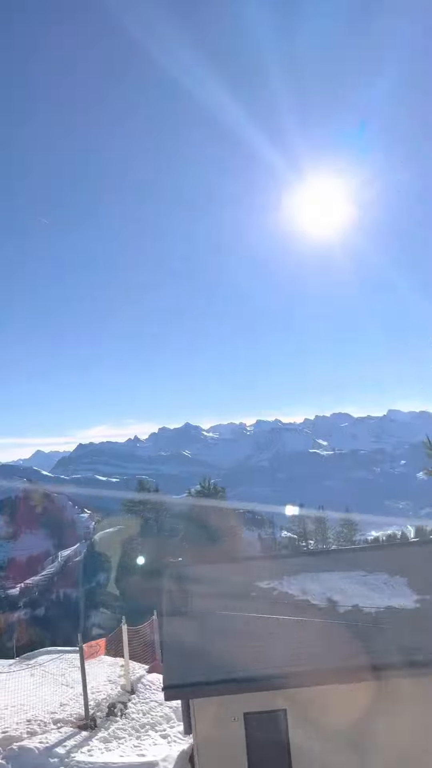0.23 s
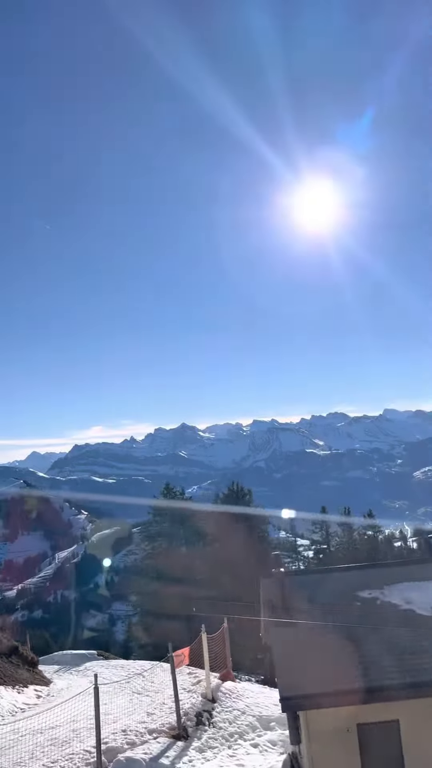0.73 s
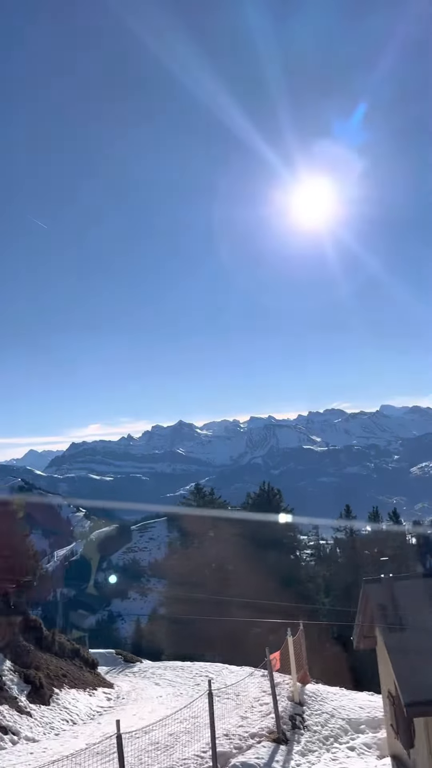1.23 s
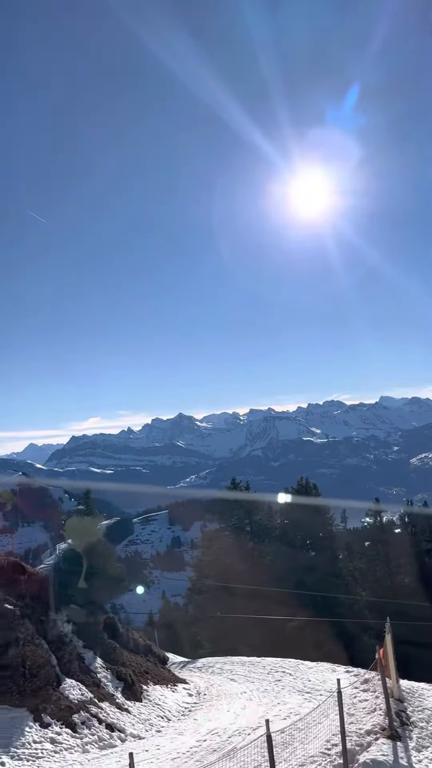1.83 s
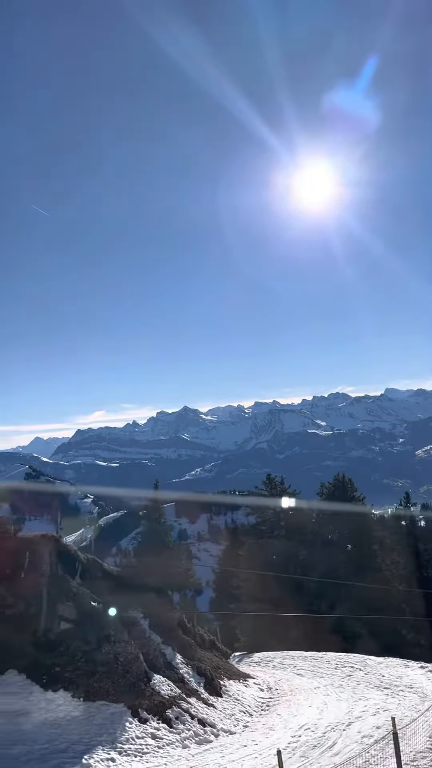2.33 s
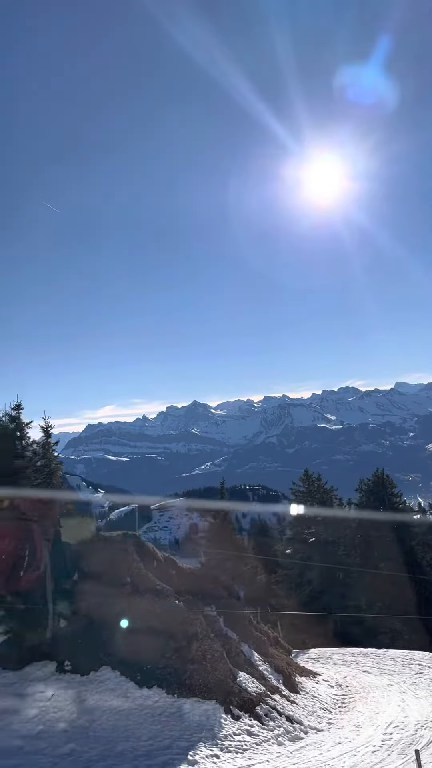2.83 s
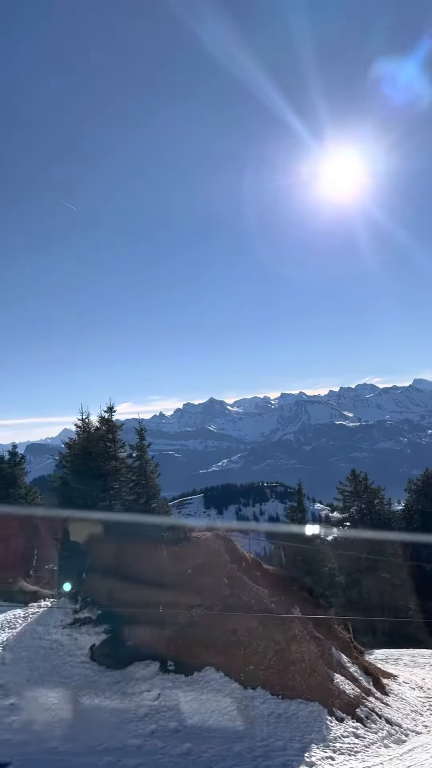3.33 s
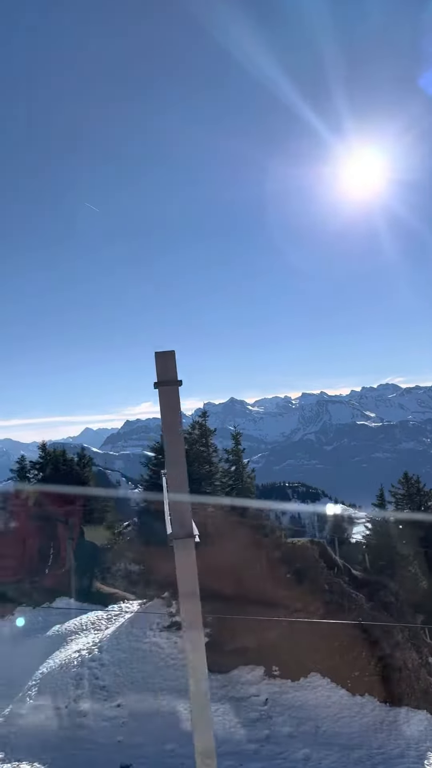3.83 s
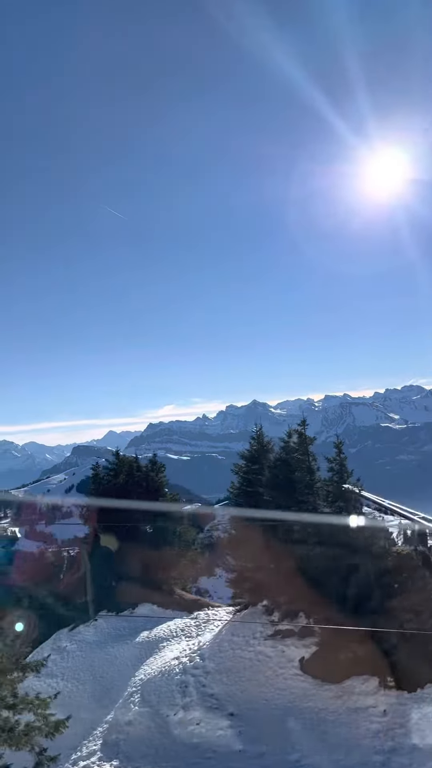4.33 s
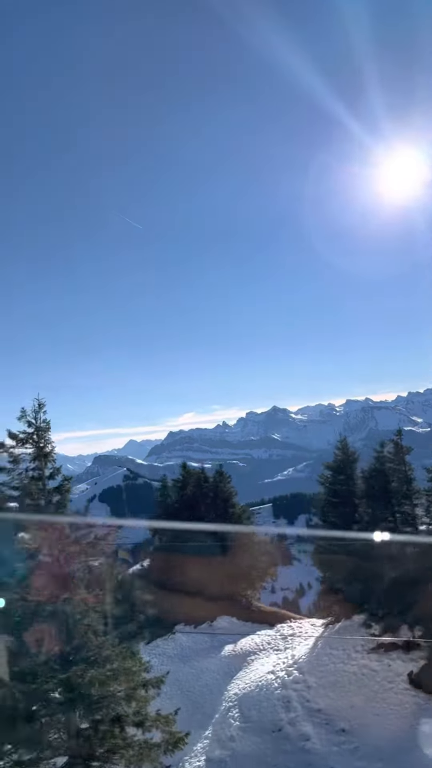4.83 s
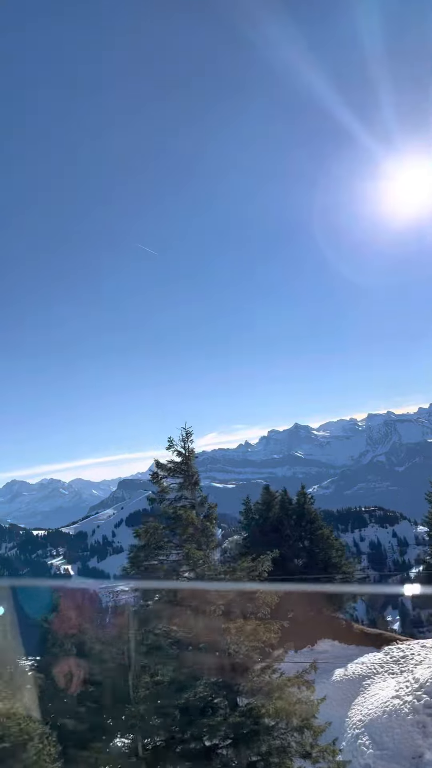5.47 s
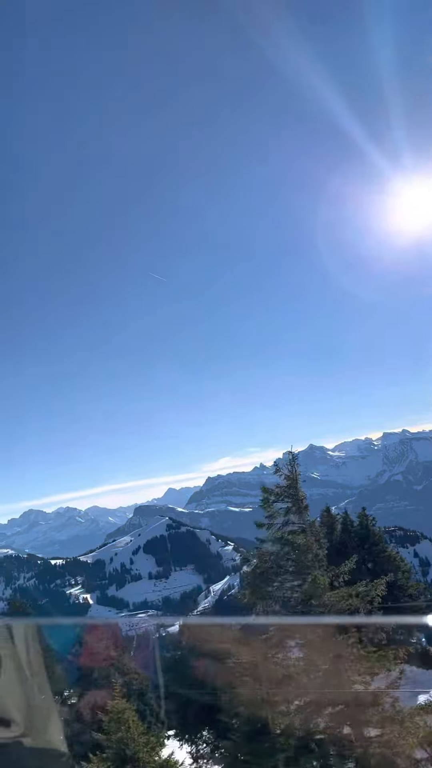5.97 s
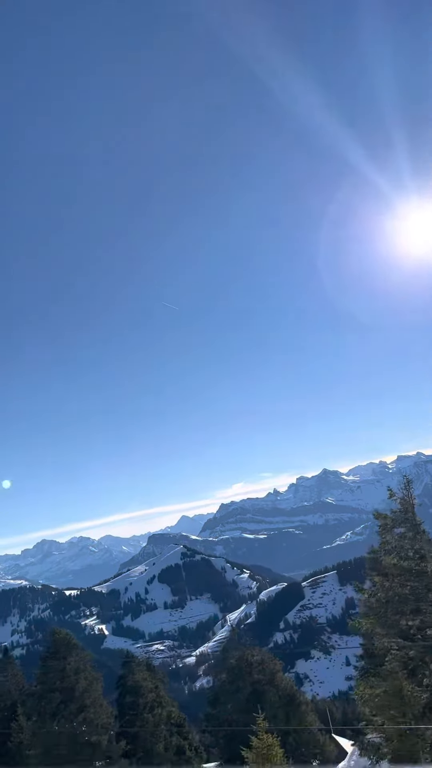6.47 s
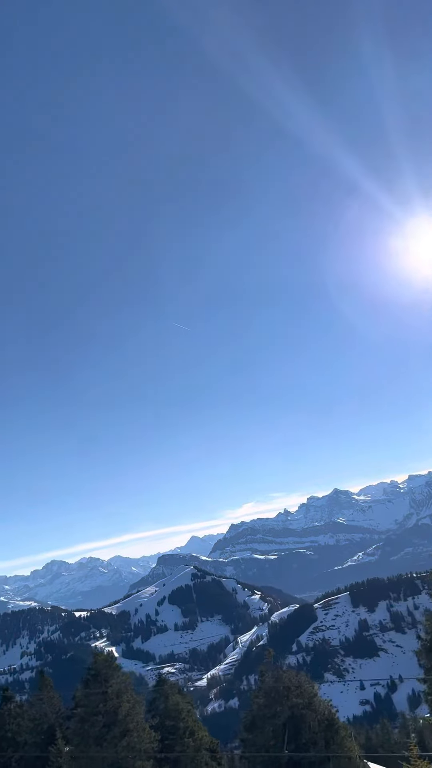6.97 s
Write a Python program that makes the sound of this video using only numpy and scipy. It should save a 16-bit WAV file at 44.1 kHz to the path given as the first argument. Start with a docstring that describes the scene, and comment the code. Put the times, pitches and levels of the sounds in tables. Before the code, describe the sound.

A cog train heard from a window seat: a deep buzzing drone grows quickly, then runs steadily with muffled knocks and soft floor thuds.

```python
"""Rack-railway carriage, from a window seat

Inside on a mountain line, on a two-port microphone; the sound swells for two seconds and then holds.
Sine tones make the cog's drone, the motor hum and the singing gears; narrow noise makes the gear whine.
Coloured stereo noise makes the floor and wall rumble, the roar and the hiss, whose treble reaches the
left port first. Damped modes make the knocks of the bumps, short tone swells the thuds of the heaving body.
A few faint squeaks are narrow noise, and one tiny dry tick is a filtered click."""
import sys
import numpy as np
from scipy import signal
from scipy.fft import rfft, irfft, next_fast_len
from scipy.io import wavfile
from scipy.ndimage import uniform_filter1d, map_coordinates

SR = 44100
rng = np.random.default_rng(int(sys.argv[2]) if len(sys.argv) > 2 else 0)


def master(y):
    """Save y as 16-bit WAV."""
    cut = np.clip(np.atleast_2d(y).T, -1, 1)
    pcm = np.round(cut * 32767)  # scale
    wavfile.write(sys.argv[1], SR, pcm.astype(np.int16))


N = 317520

# the rail roar, which also sets the level of the drive: level at full running/dB,
# growth/(dB per dB of swell), drift/(dB per s)
ROAR_RUNNING = (-42, 0.87, 0)


def amp(db):
    """Decibels to gain."""
    return 10 ** (np.asarray(db) / 20)


def unit(x):
    """x scaled to rms 1."""
    return x / np.sqrt(np.mean(x ** 2) + 1e-20)


def clock():
    """The time of each sample, in seconds."""
    return np.arange(N) / SR


def along(points, hz):
    """Each column of (f/Hz, ..) points, read on a log frequency axis."""
    f, *cols = np.transpose(points)
    return [np.interp(np.log(hz + 1), np.log(f + 1), c) for c in cols]


def curves(rows):
    """One value per sample for each column after the time."""
    s, *cols = np.transpose(rows)
    return [np.interp(clock(), s, c) for c in cols]


def wobble(rate):
    """A smooth random curve, rate knots a second."""
    knots = rng.standard_normal(int(N * rate / SR) + 4)
    steps = np.arange(0, len(knots) - 1, 1 / 10)
    return np.interp(clock() * rate, steps, map_coordinates(knots, [steps]))


def angle(hz):
    """The running phase of a moving frequency."""
    return 2 * np.pi * np.cumsum(hz) / SR


def bell(s, spread):
    """A smooth bell that rises to 1 at time s and falls away, with a standard deviation of spread seconds."""
    return np.exp(-.5 * ((clock() - s) / spread) ** 2)


def filtered(x, response):
    """x times a response of frequency."""
    m = next_fast_len(N + SR // 2)
    return irfft(rfft(x, m) * response(np.fft.rfftfreq(m, 1 / SR)), m)[..., :N]


def at_ports(pair, spectrum):
    """Two unrelated signals become coloured, partly alike sound at the two ports, their mean of rms 1."""
    # between the microphone ports: f/Hz, likeness 0-1, left lead/rad, left over right level/dB
    ports = [(50, .983, 0, 0), (140, .945, -.1, -.2), (280, .8, -.28, -.5), (440, .89, -.22, -.4),
             (580, .65, -.35, 1), (760, .64, -.2, 4), (1300, .67, -.4, 2.2), (1700, .82, 0, .6),
             (2100, .7, 1, 0), (2650, .66, 2, -.8), (3700, .6, 1.1, 1), (4700, .4, 2.1, -.6),
             (6000, .85, 3.1, 0), (8300, .86, 6.3, 0), (10400, .92, 9.4, 0), (14600, .9, 15.7, 0)]
    m = next_fast_len(N + SR // 2)
    hz = np.fft.rfftfreq(m, 1 / SR)
    likeness, lead, balance_db = along(ports, hz)
    a, b = rfft(pair, m) * amp(along(spectrum, hz)[0])
    mid = a * np.sqrt(1 + likeness)
    side = b * np.sqrt(1 - likeness)
    leftward = amp(balance_db / 2) * np.exp(1j * lead / 2)
    both = irfft(np.array([(mid + side) * leftward, (mid - side) / leftward]), m)[:, :N]
    return both / np.sqrt(np.mean(both.mean(0) ** 2) + 1e-20)


def rush(spectrum, patchy_db):
    """Coloured stereo noise with time-frequency patches of random gain, the mean of its ports at rms 1."""
    z = signal.stft(rng.standard_normal((2, N)), nperseg=512)[2]
    field = uniform_filter1d(rng.standard_normal(z.shape[1:]), size=4, axis=0)
    field = uniform_filter1d(field, size=12, axis=1)
    patchy = signal.istft(z * amp(patchy_db * unit(field)), nperseg=512)[1]
    return at_ports(patchy[:, :N], spectrum)


def steady(x, size):
    """x with its chance swells evened out over size samples."""
    return x / np.sqrt(np.abs(uniform_filter1d(x.mean(0) ** 2, size=size)) + 1e-6)


def fuzzy_line(phase, width_hz):
    """Two unrelated narrow noises around a running phase, wider for faster random curves."""
    noises = [wobble(width_hz) * np.cos(phase) + wobble(width_hz) * np.sin(phase) for _ in range(2)]
    return unit(np.array(noises))


def running(layer):
    """A layer's level in dB: it follows the train's swell and drifts about the middle of the scene."""
    # loudness of the running train, which the continuous layers follow: t/s, level/dB
    train_swell = [(0.05, -58.5), (.4, -55.5), (.8, -53), (1.3, -47), (1.55, -43.5), (2, -38), (2.4, -39.5),
                   (3.5, -38.5), (5.5, -39), (6.5, -39.5), (7.2, -38)]
    full_running_db = -38
    full_db, growth, drift_db_per_s = layer
    drift_db = drift_db_per_s * (clock() - clock().mean())
    return full_db + growth * (curves(train_swell)[0] - full_running_db) + drift_db


def shaking():
    """How hard floor and walls shake, in dB; each rough stretch comes and goes smoothly."""
    # rough track, where the rumble changes: middle t/s, spread/s, floor gain/dB, walls gain/dB
    rough = [(1.55, 0.086, 5, 4), (1.834, .06, 1, 1), (2.044, 0.049, 3, 1.5), (2.248, 0.095, 4, 1),
             (2.651, 0.29, 3, 2), (3.56, 0.034, 3, -0.5), (4.6, 0.13, 1, 2), (5.518, 0.11, 3, 1.5),
             (6.8, 0.38, 0.5, -1.5)]
    # level at full running/dB, growth/(dB per dB of swell), drift/(dB per s)
    floor_running = (-23.5, 0.7, .05)
    wall_running = (-30, 0.87, -0.062)
    floor_db = running(floor_running) + sum(db * bell(s, spread) for s, spread, db, _ in rough)
    wall_db = running(wall_running) + sum(db * bell(s, spread) for s, spread, _, db in rough)
    return floor_db, wall_db


def knock(age, hardness_db):
    """One blow of peak 1 on the floor's damped modes, each at a new strength; hardness lifts the high ones."""
    # the floor's answer to a jolt: f/Hz, level/dB, t60/s
    modes = [(114, -7.5, 0.036), (169.3, -2.5, 0.057), (227, 1, 0.049), (298, -2.5, 0.041),
             (438.6, -10, 0.036), (520, -12.5, 0.029), (611, -19.5, 0.028)]
    ring = np.zeros(len(age))
    for hz, level, t60 in modes:
        strength_db = level + hardness_db * np.log2(hz) + rng.normal(0, 2.35)
        ring += amp(strength_db - 60 * age / t60) * np.sin(2 * np.pi * hz * age)
    ring = ring * (1 - np.exp(-age / 0.0022))  # softened onset
    return ring / np.abs(ring).max()


def cog(teeth):
    """Teeth push on the rack as a tone and its octave, and a close upper tone beats so the drone throbs."""
    # level at full running/dB, growth/(dB per dB of swell), drift/(dB per s)
    cog_running = (-21, 0.87, -.1)
    # how hard the cog bears on the rack: t/s, level/dB
    bearing = [(0, -1), (2.6, -0.5), (2.9, 0), (3.35, 1.5), (4.05, -3.5), (4.55, -0.5), (5, -1), (5.5, -2),
               (5.85, -.5), (6.4, 0), (6.9, 0.5)]
    throb_hz, first_throb_s, throb_db = 4.32, .09, -9.5  # the level is against the cog's main tone
    beat = 2 * np.pi * throb_hz * (clock() - first_throb_s)
    neighbour = amp(throb_db + 0.75 * wobble(3.0)) * np.sin(teeth + beat + 0.2 * wobble(2.8))
    octave = amp(-11.5 + 3.3 * wobble(3.8)) * np.sin(2 * teeth + 0.34 * wobble(2.9))
    level_db = running(cog_running) + curves(bearing)[0] + 0.49 * wobble(5.9)
    return amp(level_db) * unit(np.sin(teeth) + neighbour + octave)


def rumble(teeth):
    """Wheels shake floor and wall panels: low noise of uneven level, the walls pulsing with the teeth."""
    # relative noise spectra: f/Hz, level/dB
    floor_colour = [(10, -31), (20, -31.5), (30, -19), (41, -10), (54, -.5), (66, 2.5), (98, -1.5),
                    (120, -5), (150, -5), (175, -15), (240, -22.5), (800, -120)]
    wall_colour = [(20, -59.5), (150, -9.5), (185, -1.5), (205, 2.5), (225, -5), (260, -0.5), (300, -5),
                   (325, -4.5), (365, -10), (425, -7), (455, -11), (490, -11.5), (590, -19.5), (2500, -120)]
    lurch_db, lurch_per_s = 1.75, 9  # random unevenness: depth on the floor, knots a second on both
    floor_db, wall_db = shaking()
    floor_db = floor_db + lurch_db * wobble(lurch_per_s)
    wall_db = wall_db + 1.54 * wobble(lurch_per_s) + np.cos(teeth)
    floor = amp(floor_db) * steady(rush(floor_colour, patchy_db=1.0), size=4500)
    walls = amp(wall_db) * steady(rush(wall_colour, patchy_db=1.0), size=4500)
    return floor + walls


def rail_noise(teeth):
    """The rail's roar, hiss and high fizz: noises that flutter together and pulse faintly with the teeth."""
    # relative noise spectra: f/Hz, level/dB
    roar_colour = [(100, -87.5), (560, -2.5), (630, 2.5), (700, -2), (780, 2), (880, -1.5), (970, -4),
                   (1150, -12), (1400, -13.5), (9000, -120)]
    hiss_colour = [(200, -82.5), (1100, 0), (1330, -1), (1700, -0.5), (2050, -0.5), (2300, 2.5),
                   (2650, 2.5), (3100, -5), (4000, -24.5), (10000, -80)]
    fizz_colour = [(800, -74), (2700, -6), (3200, -1), (3600, 2), (4200, -0.5), (5000, -2), (6100, -17),
                   (7200, -8), (8700, -23), (12200, -29.5), (14000, -26.5)]
    # level at full running/dB, growth/(dB per dB of swell), drift/(dB per s)
    hiss_running = (-44.5, 0.9, -.05)
    fizz_running = (-46.5, 0.96, -0.49)
    # the fizz flares as the swell gathers: t/s, spread/s, gain/dB
    flare_s, flare_spread, flare_db = (1.57, .08, 2.5)
    flutter_db = 0.099 * wobble(20) + 0.85 * wobble(60) + 0.19 * np.cos(teeth)
    roar_db = running(ROAR_RUNNING) + flutter_db + 0.36 * wobble(17)
    fizz_db = running(fizz_running) + flutter_db + flare_db * bell(flare_s, flare_spread)
    roar = amp(roar_db) * rush(roar_colour, patchy_db=1.4)
    hiss = amp(running(hiss_running) + flutter_db) * rush(hiss_colour, patchy_db=0.9)
    fizz = amp(fizz_db) * rush(fizz_colour, patchy_db=1.4)
    return roar + hiss + fizz


def jostle(count=110):
    """Rough rail gives small knocks at random moments and pitches, their level following the walls'."""
    age = np.arange(SR // 8) / SR
    knocks = np.zeros(N + len(age))
    for moment, size, stretch in rng.random((count, 3)):
        blow = knock(age * (0.802 + 0.422 * stretch), hardness_db=-2.5)
        knocks[int(moment * N):][:len(age)] += amp(-9 * size) * blow
    return amp(shaking()[1] - 5.5) * unit(knocks[:N])


def motor_hum(shaft):
    """The motor hums on multiples of its shaft rate, each wavering tone coming and going."""
    # multiple of the shaft rate, level/dB against the rail roar, loudest t/s, spread/s
    orders = [(2, 3, 4.4, 6.3), (3, 9, 1.9, 1.5), (4, 11.5, 2.8, 5.4), (4.5, 10, 2.9, 1.73),
              (6, 4.5, 6.4, 4)]
    hum = 0
    for k, db, s, spread in orders:
        tone = unit(np.sin(k * shaft + 0.19 * wobble(4.08)))
        hum = hum + amp(db + 1.9 * wobble(3.056)) * bell(s, spread) * tone
    return hum


def gear_whine(full_speed):
    """The gears whine as narrow noises whose pitch follows the motor's speed."""
    # f/Hz at full speed, width/Hz (knot rate), level/dB against the rail roar, loudest t/s, spread/s
    whines = [(420.7, 22, 2.3, 2, 3.5), (444.6, 22, 1, 2.9, 4.6), (825, 50, -8, 1.8, .9),
              (876, 40, -9.5, 2.6, 3), (1323, 100, -13, 4.3, 3.1), (2693, 130, -8, 2.6, 2.8)]
    whine = 0
    for hz, width_hz, db, s, spread in whines:
        whine = whine + amp(db) * bell(s, spread) * fuzzy_line(full_speed * hz, width_hz)
    return np.std(whine) * at_ports(whine, [(400, 0.0072), (3000, 0)])


def gear_singing(full_speed):
    """The gears sing in clean tones, unsteady in level and phase, stronger on the left."""
    # f/Hz at full speed, level/dB against the rail roar, loudest t/s, spread/s
    tones = [(450.5, -3.5, 6.5, .7), (786, -11, 7, .6), (823, -7, 5.7, .65), (822, -12, 1, 1.6),
             (871, -7, 2.9, 2), (967, -18, 4.6, 2)]
    waver_db, waver_rad, left_over_right_db = 2.6, .5, 2.5
    singing = 0
    for hz, db, s, spread in tones:
        tone = unit(np.sin(full_speed * hz + waver_rad * wobble(6)))
        singing = singing + amp(db + waver_db * wobble(6.1)) * bell(s, spread) * tone
    return amp(np.array([[.5], [-.5]]) * left_over_right_db) * singing


def drive():
    """Motor and gears turn on one shaft phase, and their tones share the level of the rail roar."""
    # motor speed: t/s, turns per second
    motor_speed = [(0, 35.2), (4, 35.15), (5.3, 35.1), (6.3, 34.65), (7.2, 34.4)]
    turns, = curves(motor_speed)
    shaft = angle(turns)
    full_speed = shaft / turns.max()  # phase of a tone per Hz at full speed
    return amp(running(ROAR_RUNNING)) * (motor_hum(shaft) + gear_singing(full_speed) + gear_whine(full_speed))


def bumps():
    """Wheels bump over uneven track: each jolt knocks the floor and leaves a short, dull shudder of noise."""
    # t/s, level/dB before the knock and shudder offsets, hardness/(dB per octave)
    jolts = [(1.552, -26, 0), (2.024, -23, 0), (2.046, -24, 0), (2.061, -23, 3), (2.495, -25, 1),
             (2.790, -25, 2), (3.333, -19, -1), (3.491, -21, 1), (3.572, -22, 11), (4.439, -25, 0),
             (4.451, -21.5, 1), (4.506, -15, 0), (4.578, -17, 6), (5.263, -25, 0), (5.312, -24, 3),
             (5.456, -20, 3), (5.487, -26, 18), (5.508, -20.5, 6), (5.525, -22.5, 6), (5.542, -26.5, 3),
             (6.038, -21.5, -1), (6.275, -29, 10), (6.372, -28, 12)]
    # relative spectrum of the shudder: f/Hz, level/dB
    shudder_colour = [(20, -48.5), (70, -7), (130, 1.5), (270, -1.5), (420, 0.5), (580, -12), (700, -24.5),
                      (1000, -42.5), (3000, -100)]
    knock_db, shudder_db = 6.5, -11  # offsets from the jolt's level
    rise_s, shudder_t60_s = .002, .16
    muffle_hz = 640  # the floor muffles a blow above this
    age = np.arange(SR // 4) / SR
    fade = amp(-60 * age / shudder_t60_s) * (1 - np.exp(-age / rise_s))
    knocks, shudder = np.zeros(N), np.zeros(N)
    for s, db, hardness_db in jolts:
        start = round(s * SR)
        knocks[start:][:len(age)] += amp(db + knock_db) * knock(age, hardness_db)
        shudder[start:][:len(age)] += amp(db + shudder_db) * fade
    muffled = filtered(knocks, lambda hz: 1 / np.hypot(1, (hz / muffle_hz) ** 10))
    return muffled + shudder * rush(shudder_colour, patchy_db=1.0)


def thuds():
    """The carriage heaves: a deep boom builds up over a few cycles and dies almost as quickly."""
    # loudest t/s, peak level/dB before the common trim, f/Hz
    heaves = [(1.594, -22, 148), (1.818, -19, 151), (2.042, -11.5, 147), (2.064, -13, 89),
              (2.21, -13.5, 93), (2.245, -13.5, 153), (2.314, -14.5, 94), (2.544, -15.5, 87),
              (2.606, -17, 95), (2.842, -15, 81), (3.215, -18, 82), (3.584, -12.5, 87), (3.929, -15.5, 84),
              (4.28, -17, 173), (4.348, -12.5, 81), (4.458, -18, 183), (4.535, -11.5, 74),
              (4.61, -16.5, 159), (4.659, -17, 158), (4.729, -17.5, 172), (4.83, -17.5, 146),
              (4.965, -16, 80), (5.318, -17.5, 152), (5.38, -18, 101), (5.53, -19.5, 164), (5.582, -17, 80),
              (5.735, -19, 152), (5.808, -17, 91), (6.047, -15, 170), (6.145, -14.5, 91),
              (6.395, -13.5, 86), (7.04, -15, 90), (7.171, -15, 77)]
    rise_cycles, fall_cycles, trim_db = 1.4, 1.8, -1.5
    booms = np.zeros(N)
    for s, db, hz in heaves:
        cycles = (np.arange(-SR // 8, SR // 8) / SR) * hz
        width = np.where(cycles < 0, rise_cycles, fall_cycles)
        boom = np.exp(-.5 * (cycles / width) ** 2) * np.sin(2 * np.pi * (cycles + rng.random()))
        start = round(s * SR) - SR // 8
        booms[start:][:len(boom)] += amp(db) * boom[:N - start]
    return amp(trim_db) * booms


def gear_surges():
    """The lowest gear tone flares up in short swells, its pitch wandering from one to the next."""
    # t/s, level/dB, f/Hz
    flares = [(2.07, -34, 430), (2.283, -35, 438), (2.469, -34.5, 430), (2.697, -35, 440),
              (2.889, -32.5, 427), (3.11, -31, 429), (3.926, -34.5, 438), (4.299, -35, 432),
              (4.43, -35, 431), (4.839, -32, 440), (5.17, -33.5, 423)]
    wander_hz, spread_s = 3.02, 0.026
    hz = curves(flares)[1] + wander_hz * wobble(16)
    swell = sum(amp(db) * bell(s, spread_s) for s, db, _ in flares)
    return swell * amp(1.2 * wobble(50)) * unit(np.sin(angle(hz)))


def squeaks():
    """A flange brushes the rail and the wheel rasps for an instant: a narrow noise under a short bell."""
    # t/s, f/Hz, level/dB, spread/s
    rasps = [(2.09, 860, -39, .014), (2.22, 2690, -42.5, 0.007), (2.636, 2240, -39, .005),
             (2.658, 2240, -40, 0.0086)]
    total = np.zeros(N)
    for s, hz, db, spread in rasps:
        line = fuzzy_line(2 * np.pi * hz * clock(), width_hz=220)[:1]
        total += amp(db) * bell(s, spread) * steady(line, size=500)[0]
    return total


def ticks():
    """One tiny dry tick: a click one sample long before it is coloured."""
    # t/s, level/dB before colouring
    clicks = [(5.387, -21.5)]
    # the tick's colour: f/Hz, gain/dB
    tick_colour = [(500, -2), (2500, 6), (5500, 3), (8300, -4), (11000, -8), (14000, -9)]
    click = np.zeros(N)
    for s, db in clicks:
        click[round(s * SR)] = amp(db)
    return filtered(click, lambda hz: amp(along(tick_colour, hz)[0]))


def scene():
    """Everything heard from a seat by the window."""
    # rack teeth passing: t/s, teeth per second
    mesh = [(0, 48.25), (5.8, 48.25), (6.2, 47.55), (7.2, 47.5)]
    teeth = angle(curves(mesh)[0])
    track = cog(teeth) + rumble(teeth) + rail_noise(teeth) + jostle()
    return track + drive() + bumps() + thuds() + gear_surges() + squeaks() + ticks()


def record(dry):
    """The sound starts abruptly after a 36 ms silence; the deepest sway and all above the band limit go."""
    start_s, sway_hz, top_hz = .036, 8, 14000
    return filtered(dry * (clock() > start_s), lambda hz: (hz < top_hz) * hz / np.hypot(hz, sway_hz))


dry = scene()
out = record(dry)
master(out)
```